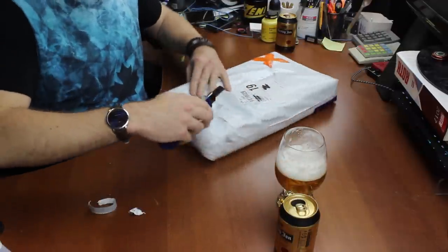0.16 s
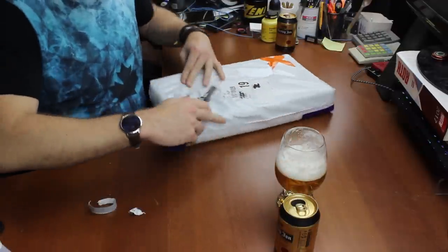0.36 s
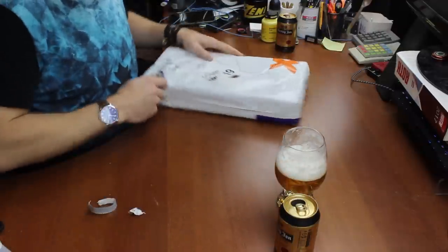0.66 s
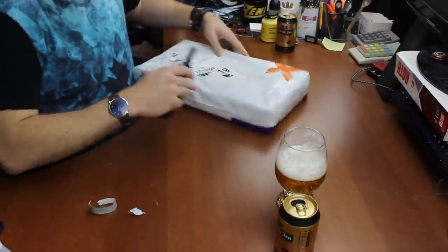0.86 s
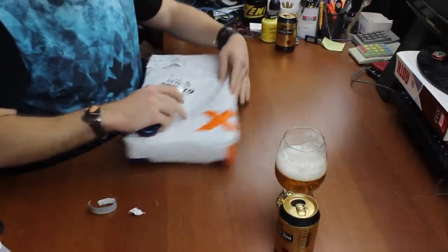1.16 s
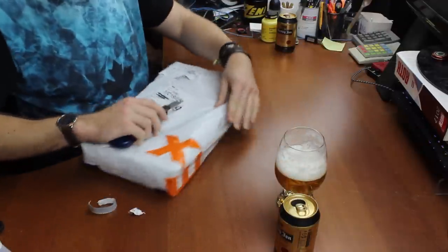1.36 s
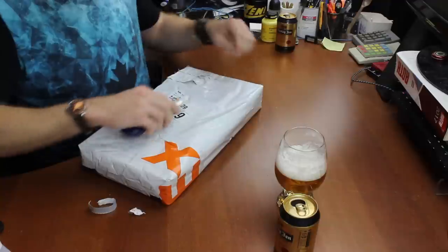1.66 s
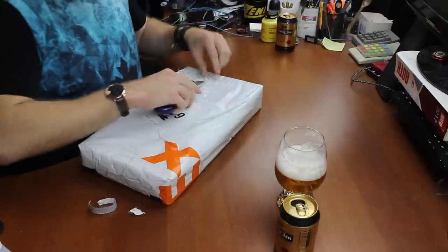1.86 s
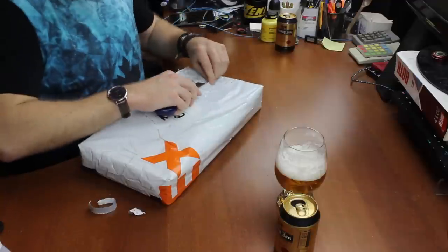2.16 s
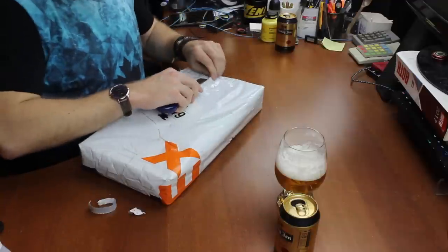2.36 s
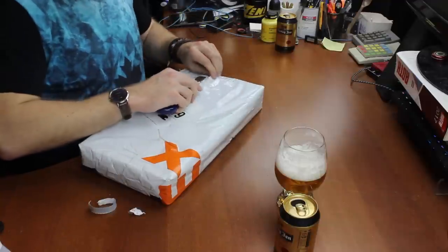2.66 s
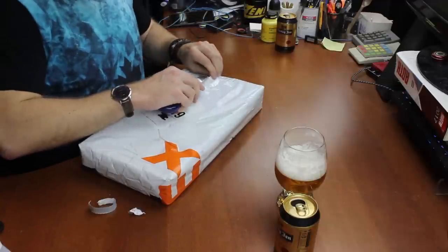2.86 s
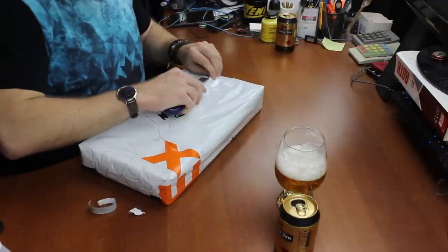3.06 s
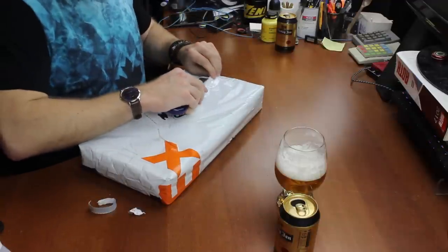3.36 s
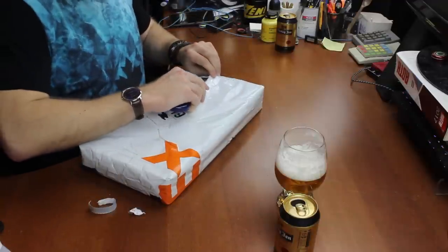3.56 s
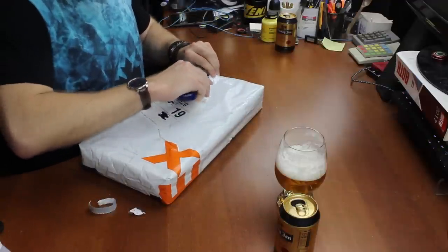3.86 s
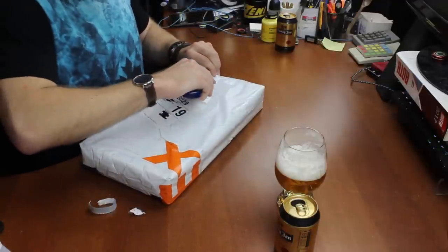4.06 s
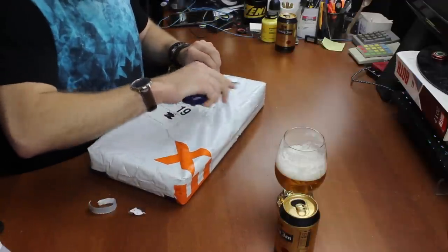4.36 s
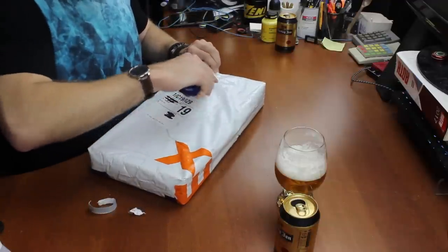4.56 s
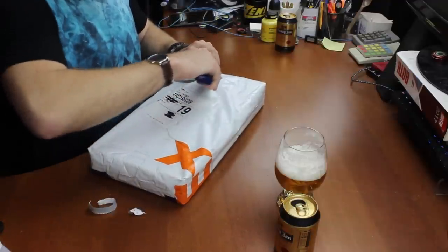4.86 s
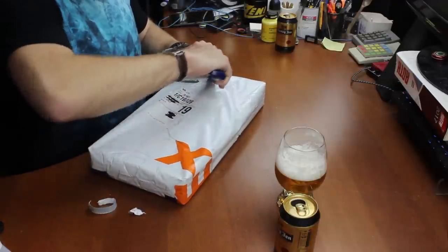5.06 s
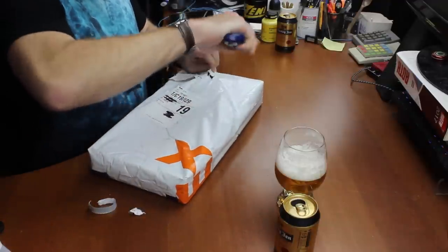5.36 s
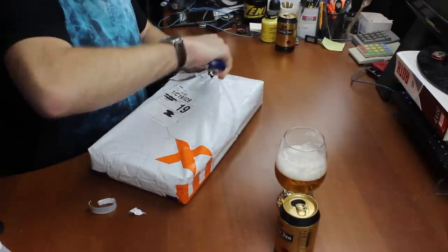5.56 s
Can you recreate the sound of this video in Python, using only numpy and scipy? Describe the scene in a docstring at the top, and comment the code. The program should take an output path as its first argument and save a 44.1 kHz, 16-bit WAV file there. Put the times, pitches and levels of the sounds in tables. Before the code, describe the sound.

Stiff plastic film crinkles as a parcel is turned on a desk, followed by quiet picking, faint cutting rasps and two sharp rips.

```python
"""Slitting open a bagged parcel

A box wrapped in a plastic courier bag is swung round on a wooden desk in a small room, then slit with a
utility knife. The sliding bag is noise from countless slips; taut film snaps as decaying tones with bright
cracks, crinkles as random small pops, and tears in two loud bursts that ring the modes of the box.
A diffuse echo follows close behind, over the room's hush and the low rumble of the camera rocking nearby.
"""
import sys
import numpy as np
from scipy import signal
from scipy.fft import rfft, irfft
from scipy.io import wavfile
from scipy.ndimage import uniform_filter1d

SR = 44100
rng = np.random.default_rng(int(sys.argv[2]) if len(sys.argv) > 2 else 0)


def to_wav(sig):
    """Store sig (one row per channel, or 1-D mono) as 16-bit WAV at the path in sys.argv[1].

    Samples outside -1..1 are clipped; the rate is SR.
    """
    pcm = np.clip(np.atleast_2d(sig), -1, 1) * 32767
    pcm = np.round(pcm).astype(np.int16)
    wavfile.write(sys.argv[1], SR, pcm.T)  # frames by channels


N = 252285
TIME = np.arange(N) / SR
SNAP_S = 0.008  # the span over which the level of a short sound is reckoned

# the box is jolted: t/s, pitch of the struck wall f/Hz, level/dB before the trims in thuds()
JOLTS = [(0.0865, 480, -50), (0.44, 570, -45.5), (0.552, 238, -48.5), (0.643, 234, -46.5),
         (0.771, 395, -47), (0.790, 320, -44), (0.878, 318, -49.5), (1.01, 252, -44.5), (1.2615, 377, -45),
         (1.273, 370, -52), (1.327, 370, -52), (1.528, 408, -49), (2.318, 276, -46), (2.752, 242, -47),
         (3.898, 260, -43), (4.3533, 250, -25.5), (4.383, 250, -24), (4.821, 209, -46.5), (5.156, 258, -48),
         (5.28, 240, -25), (5.3039, 233, -32)]
# the bag slides on the desk: t/s, hiss level/dB, treble level/dB above 9 kHz, both before the trims in slide()
DRAG = [(0, -43.5, -54.5), (0.119, -41, -49.5), (0.22, -43, -52), (0.36, -47.5, -56), (0.5, -43, -53),
        (0.58, -45, -53.5), (0.72, -41.5, -51), (0.84, -45.5, -56.5), (0.92, -42.5, -47.5),
        (1.0, -39.5, -42.5), (1.12, -34, -40.5), (1.22, -27.5, -39.5), (1.32, -35.5, -45.5),
        (1.42, -42, -52.5), (1.55, -46, -55), (1.621, -74, -78)]


def amp(db):
    """Decibels to gain."""
    return 10 ** (np.asarray(db) / 20)


def unit(x):
    """Scales to an rms of one."""
    return x / np.sqrt(np.mean(x ** 2) + 1e-20)


def read(points, hz):
    """Reads a spectrum on a log-frequency axis."""
    f, value = np.transpose(points)
    return np.interp(np.log(hz + 1), np.log(f + 1), value)


def add(mix, s, sound):
    """Mixes a sound in at time s."""
    part = mix[max(round(s * SR), 0):][:len(sound)]
    part += sound[:len(part)]


def sized(x, db, span_s=SNAP_S):
    """Scales a short sound so that its energy, spread over span_s, has this level."""
    return x * amp(db) * np.sqrt(span_s * SR / (np.sum(x ** 2) + 1e-20))


def above(hz, corner_hz, order):
    """A soft step from 0 to 1 around a corner frequency."""
    return 1 / (1 + (corner_hz / (hz + 1)) ** order)


def causal(db):
    """The frequency response with these gains that rings only after it is struck."""
    log_gain = np.log(amp(np.r_[db, db[-2:0:-1]]))
    return np.exp(np.conj(signal.hilbert(log_gain)))[:len(db)]


def noise(spectrum):
    """Steady noise of the given spectrum, at an rms of one."""
    gain = amp(read(spectrum, np.fft.rfftfreq(N, 1 / SR)))
    return unit(irfft(rfft(rng.standard_normal(N)) * gain, N))


def clicks(per_s, spread_db):
    """A random train of clicks, most small and a few large."""
    sizes = amp(spread_db * np.minimum(rng.exponential(1, N), 4))
    return sizes * rng.choice([-1, 1], N) * (rng.random(N) < per_s / SR)


def gesture(start, length, rise_db_per_s, fall_db_per_s):
    """Attack, hold and release in dB: zero while the gesture lasts."""
    early_s = np.maximum(start - TIME, 0)
    late_s = np.maximum(TIME - start - length, 0)
    return -rise_db_per_s * early_s - fall_db_per_s * late_s


def hush(level_db=-59.0):
    """The room's steady background, mostly low-pitched noise."""
    # its spectrum: f/Hz, relative level/dB
    floor = [(20, 4.5), (100, -6.5), (150, -9.5), (230, -3.5), (320, -16.5), (500, -25), (1300, -26.5),
             (3500, -37.5), (15000, -32)]
    return amp(level_db) * noise(floor)


def sway(rest_db=-49.0, drag_db=-38.5, jolt_db=-5.5, lag_s=0.19, width_s=0.21, settle_db_per_s=88):
    """How far the camera rocks, as a gain: the drag shakes the desk, and so does every jolt."""
    drag = amp(drag_db + gesture(0, DRAG[-1][0], 0, settle_db_per_s))
    # the rocking peaks a moment after each jolt, jolt_db relative to its level in the table
    jolts = [amp(db + jolt_db) * np.exp(-((TIME - s - lag_s) / width_s) ** 2) for s, _, db in JOLTS]
    return np.max([drag, *jolts], axis=0) + amp(rest_db)


def rumble():
    """Very low noise from the camera rocking on the desk."""
    # its spectrum: f/Hz, relative level/dB
    rocking = [(5, -7.5), (16, -0.5), (27, -21.5), (42, -18), (70, -38), (250, -71.5)]
    return sway() * noise(rocking)


def room(x, build_s=0.0042, size=26000):
    """The diffuse echo of the small room, each band dying at its own speed."""
    # how long the room rings: f/Hz, t60/s
    ring_times = [(200, 0.29), (1500, 0.2), (5000, 0.3), (9000, 0.22), (15000, 0.23)]
    # strength of its echo: f/Hz, level/dB
    strength = [(100, -14), (600, -10), (1300, -12.5), (2500, -7.5), (6000, -11.5), (9000, -8.5),
                (16000, -9)]
    t = np.arange(size) / SR
    taps = rng.choice([-1., 1.], size) * (rng.random(size) < 1 / 4)
    # nothing until build_s, then a rise of the same length
    taps *= np.clip(t / build_s - 1, 0, 1)
    hz, frame_s, z = signal.stft(taps, SR, nperseg=256)
    t60 = np.maximum(read(ring_times, hz), .1)[:, None]
    fade = amp(-60 * frame_s / t60)
    fade *= amp(read(strength, hz))[:, None] / np.sqrt(np.mean(fade ** 2, axis=1, keepdims=True))
    tail = signal.istft(z * fade, nperseg=256)[1][:size] / np.linalg.norm(taps)
    return signal.oaconvolve(x, tail)[:N]


def moving_echo(x, turn_hz=0.911, count=3):
    """As hands and parcel move, the sound takes changing paths round the room."""
    turn = 2 * np.pi * TIME * turn_hz
    paths = [room(x * np.cos(turn + np.pi * k / count)) for k in range(count)]
    return sum(paths) * np.sqrt(2 / count)


def scatter(x, near_db=-7.0, near_s=0.0035, size=1024):
    """Quick reflections off the desk and the moving hands, drawn afresh on each call."""
    t = np.arange(size) / SR
    taps = rng.standard_normal(size) * np.exp(-t / near_s) * (t > .002)
    return x + amp(near_db) * signal.fftconvolve(x, taps / np.linalg.norm(taps))[:len(x)]


def nudge(start_s=3.52, length_s=0.092, hz=114, sag_octaves=0.4, db=-56.0):
    """A hand leans on the parcel and it gives a soft, low, sinking groan."""
    t, out = np.arange(0, length_s, 1 / SR), np.zeros(N)
    pitch_hz = hz * 2 ** (sag_octaves * (.5 - t / length_s))
    turns = np.cumsum(pitch_hz) / SR
    add(out, start_s, sized(np.sin(2 * np.pi * turns) * np.hanning(len(t)), db, length_s))
    return out


def thuds(ring_trim_db=1.5, push_trim_db=-2.0, push_cycles=0.64, reach_octaves=0.55, spill=0.43,
          span_s=0.0087, size=16000):
    """A jolt pushes a wall of the box; the modes nearest to that wall's pitch ring most."""
    # modes of the box on the desk: f/Hz, relative level/dB, t60/s
    modes = [(43, 2, 0.35), (67.7, 0, 0.3), (163.7, 2.5, 0.2), (198.3, 1, 0.17), (227, 1.5, 0.12),
             (346.5, 1, 0.092), (370, 0, 0.13)]
    t, out = np.arange(size) / SR, np.zeros(N)
    hz, mode_db, t60 = np.transpose(modes)[:, :, None]
    for s, wall_hz, db in JOLTS:
        push = np.sin(2 * np.pi * wall_hz * t) * np.sqrt(t) * np.exp(-t * wall_hz / push_cycles)
        share = spill + np.exp(-(np.log2(hz / wall_hz) / reach_octaves) ** 2)
        # the modes start in step, so the thump is tight and only a faint beating follows
        ring = np.sum(share * amp(mode_db - 60 * t / t60) * np.sin(2 * np.pi * hz * t), axis=0)
        add(out, s, sized(ring, db + ring_trim_db, span_s) + sized(push, db + push_trim_db, span_s))
    return out


def slide(hiss_trim_db=-1.5, sheen_trim_db=3.0, body_hz=3000, sheen_hz=9200, patchy_db=1.45, grain=0.44,
          even_db=-52, body_lag=0.65):
    """Countless tiny slips of film on wood; the hiss brightens as the parcel gathers speed."""
    # colour of the hiss: f/Hz, relative level/dB
    hiss_colour = [(60, 5.5), (200, 2.5), (650, -7), (1000, 0.5), (2100, 6.5), (3600, 1), (5800, 2),
                   (6900, 0), (7900, 2.5), (9500, -1), (13000, 0), (16000, -8)]
    slips = rng.standard_normal(N) + grain * unit(clicks(1200, 4.2))
    hz, t, z = signal.stft(unit(slips), SR, nperseg=512, noverlap=384)
    s, *columns = np.transpose(DRAG)
    hiss, treble = (np.interp(t, s, c) for c in columns)
    # the low body grows more slowly than the hiss: they match at even_db, and it lags by body_lag dB per dB
    body = body_lag * (even_db - hiss)
    sheen = treble - hiss + sheen_trim_db
    hz = hz[:, None]
    # the texture is patchy over neighbouring bands and moments
    patches = uniform_filter1d(rng.standard_normal(z.shape), size=9, axis=0)
    patches = unit(uniform_filter1d(patches, size=16, axis=1))
    colour = read(hiss_colour, hz) + body * (1 - above(hz, body_hz, order=4))
    colour = colour + sheen * above(hz, sheen_hz, order=10)
    z = z * amp(hiss + hiss_trim_db + colour + patchy_db * patches) * (t < s[-1])
    # the hiss level is reckoned over a band 6 kHz wide
    band_share = 6000 / (SR / 2)
    return signal.istft(z, nperseg=512, noverlap=384)[1][:N] / np.sqrt(band_share)


def pop(hz, ring_s=0.0007, overtone=1.438, overtone_share=0.31, size=1024):
    """A panel of taut film flips over: a few cycles swell and die."""
    t = np.arange(size) / SR
    upper_hz = hz * overtone * rng.uniform(0.92, 1.26)
    upper = overtone_share * np.sin(2 * np.pi * upper_hz * t)
    return -(np.sin(2 * np.pi * hz * t) + upper) * t ** 0.47 * np.exp(-t / ring_s)


def crack(sheen_db, fade_s=0.0016, rise_s=0.000086, sheen_hz=9000, size=1024):
    """A short run of tiny breaks, or a single one if fade_s is 0; its 3-9 kHz band has a level of 0 dB."""
    # colour of breaking film: f/Hz, relative level/dB
    crack_colour = [(100, -18), (550, -14), (1400, -2), (2600, -5), (3700, -3), (5500, 1.5), (6800, -3),
                    (8200, 0.5), (9500, -0.5), (13000, 1), (16000, -9)]
    t, hz = np.arange(size) / SR, np.fft.rfftfreq(size, 1 / SR)
    if fade_s:
        breaks = rng.standard_normal(size) * np.exp(-t / fade_s) * (1 - np.exp(-t / rise_s))
    else:
        breaks = signal.unit_impulse(size)
    z = rfft(breaks) * causal(read(crack_colour, hz) + sheen_db * above(hz, sheen_hz, order=10))
    core = irfft(z * (hz > 3000) * (hz < 9000))
    return irfft(z) * np.sqrt(SNAP_S * SR / np.sum(core ** 2))


def creases(low_hz, high_hz, ring_s, crack_db, per_s, count=20):
    """Creases of many sizes, each popping at random; a few pops are large."""
    out = np.zeros(N)
    for hz in np.geomspace(low_hz, high_hz, count):
        crease = sized(pop(hz, ring_s=ring_s), 0) + amp(crack_db) * crack(-19.0)
        out += signal.oaconvolve(clicks(per_s, 4.2), scatter(crease))[:N]
    return unit(out)


def grip(tighten_db_per_s=257.5, relax_db_per_s=108, hold_db=-65.5):
    """How hard the fingers work the bag, as a gain; between squeezes they merely rest on the film."""
    # the fingers squeeze or shift their hold: start t/s, length t/s, level/dB before the shares in crinkle()
    squeezes = [(0.02, 0.29, -48.5), (0.475, 0.16, -42), (0.75, 0.15, -44.5), (1.23, 0.044, -41.5),
                (1.528, 0.15, -55), (1.99, 0.17, -56.5), (2.29, 0.059, -46), (3.04, 0.076, -57),
                (3.306, 0.13, -56.5), (3.512, 0.34, -52.5), (4.005, 0.35, -47.5), (4.382, 0.18, -57.5),
                (4.78, 0.06, -52.5), (4.996, 0.29, -51), (5.228, 0.11, -47.5)]
    curves = [db + gesture(start, length, tighten_db_per_s, relax_db_per_s) for start, length, db in squeezes]
    return amp(np.maximum(np.max(curves, axis=0), hold_db))


def crinkle(fine_db=-5.0, broad_db=-13.0, resting_db=0.5):
    """Small creases tick under the fingers; broad folds bump, a touch stronger once the slide is over."""
    fine = creases(low_hz=950, high_hz=2390, ring_s=0.00062, crack_db=-6.5, per_s=9.0)
    broad = creases(low_hz=302, high_hz=792, ring_s=0.0014, crack_db=-18.0, per_s=22.0)
    resting = TIME > DRAG[-1][0]
    return grip() * (amp(fine_db) * fine + amp(broad_db + resting_db * resting) * broad)


def pressure(bite_db=-68, bite_db_per_s=354, ease_db_per_s=157.5):
    """How hard the blade bears on the film, as a gain: a light bite changes to the end level, then dies away."""
    # strokes of the knife: start t/s, length t/s, rasp level/dB at the end
    strokes = [(1.945, 0.45, -57.5), (3.296, 0.01, -55), (3.506, 0.53, -72), (4.056, 0.24, -43.5),
               (5.067, 0.25, -45.5)]
    total = np.zeros(N)
    for start, length, end_db in strokes:
        bearing_db = np.interp(TIME, [start, start + length], [bite_db, end_db])
        total += amp(bearing_db + gesture(start, length, bite_db_per_s, ease_db_per_s))
    return total


def blade(sheen_db=-11.5, smooth=0.93, spread_db=5.5, count=6):
    """The edge parts the film in a dense run of minute cracks, over a smooth rub."""
    teeth = np.zeros(N)
    for _ in range(count):
        teeth += signal.oaconvolve(clicks(98, spread_db), crack(sheen_db, fade_s=0.00015))[:N]
    rub = signal.oaconvolve(rng.standard_normal(N), crack(sheen_db, fade_s=0))[:N]
    return pressure() * unit(unit(teeth) + smooth * unit(rub))


def snaps(pop_trim_db=-4.5, crack_trim_db=-1.0, full_rip_s=0.0014, rip_growth=0.13, crumb_db=-18.5,
          before_s=0.0024, after_s=.014, lead_db=-28.0, lead_s=0.004, count=3):
    """Each snap is a hollow pop with a bright crack, amid a few crumbs: (towards the microphone, into the room)."""
    # film buckling or giving way: t/s, pitch of the popping panel f/Hz, pop level/dB and crack level/dB
    # (both before trims), sheen level/dB above 9 kHz relative to the crack
    film_snaps = [(0.035, 1310, -35.5, -50, -15), (0.0865, 1280, -37, -45.5, -10),
                  (0.1292, 2050, -35.5, -46, -10), (0.157, 1390, -41, -46, -15),
                  (0.2553, 2050, -35, -59, -18), (0.6, 1500, -44, -53, -13), (0.621, 1800, -39, -44.5, -18),
                  (0.642, 2160, -32, -37, -32), (0.768, 1560, -39, -65, -15),
                  (0.7823, 1760, -33.5, -46.5, -17), (0.789, 1600, -41.5, -42, -17),
                  (0.868, 2550, -40.5, -54, -15), (0.8772, 2550, -36, -37.5, -25),
                  (0.89, 2170, -42, -45, -13), (0.9036, 2260, -33.5, -42.5, -18),
                  (1.011, 1040, -39, -46, -17), (1.1377, 1300, -40, -35.5, -21),
                  (1.2622, 2450, -38, -34, -8), (1.2718, 2280, -31, -42, -10),
                  (1.3201, 1650, -40, -35, -22), (1.327, 1690, -36.5, -44, -20),
                  (1.629, 1600, -60, -53, -12), (1.6485, 2120, -54, -52, -15), (1.757, 1650, -56, -54, 5),
                  (1.8208, 2030, -51, -50, -3), (1.92, 1970, -55, -57.5, -7),
                  (1.955, 2070, -51.5, -59, -14), (2.0109, 2300, -43, -54.5, -42),
                  (2.038, 2200, -45.5, -57, -23), (2.0612, 2310, -51.5, -56, -27),
                  (2.2302, 2070, -47, -42, -11), (2.2733, 1860, -33, -43.5, -10),
                  (2.313, 1710, -34, -54, -25), (2.3189, 1770, -31.5, -36.5, -7),
                  (2.3323, 1980, -35, -42, -47), (2.360, 1660, -57, -51.5, 0),
                  (2.384, 1570, -35.5, -57, -41), (2.461, 1500, -44.5, -59, -33),
                  (2.48, 1920, -48, -63, -28), (2.7508, 1435, -25.5, -36, -22),
                  (3.122, 1460, -47, -58, -23), (3.3138, 1660, -37.5, -43, 4),
                  (3.362, 1500, -38.5, -47, -24), (3.401, 1610, -42.5, -56, -24),
                  (3.431, 1530, -45, -57, -17), (3.5171, 1500, -35.5, -43, -11),
                  (3.5463, 1490, -36, -43.5, -20), (3.6161, 1350, -51, -36, -12),
                  (3.6647, 1620, -41.5, -38, -10), (3.774, 1260, -21.5, -30, -10),
                  (3.8973, 1670, -34, -40, -18), (3.9523, 1220, -37, -51.5, -59),
                  (4.1228, 1420, -36.5, -45, -21), (4.137, 1900, -42, -38.5, -15.5),
                  (4.3534, 1360, -9.5, -20.5, -5.5), (4.383, 1360, -12.5, -17, -14.5),
                  (4.3911, 1570, -20, -35.5, -15), (4.4811, 1460, -34.5, -48.5, -39),
                  (4.5227, 1350, -38, -63, -22), (4.546, 1200, -46.5, -64, -22),
                  (4.812, 1310, -46, -65, -20), (4.8245, 1390, -41.5, -48, -9),
                  (4.8818, 1140, -43, -57.5, -51), (4.9809, 1520, -42, -43.5, -34),
                  (5.0227, 1050, -44.5, -70, -22), (5.039, 1200, -48, -53.5, -14),
                  (5.088, 1250, -57, -51.5, 0), (5.1299, 1230, -31.5, -40, -4),
                  (5.155, 1290, -24.5, -20, -17.5), (5.2363, 1160, -26.5, -44.5, -6),
                  (5.2599, 1330, -23, -29, -13), (5.2753, 1230, -16, -23, -22),
                  (5.281, 1180, -20, -36.5, 1), (5.2844, 1350, -15, -30, -22),
                  (5.3034, 1540, -15, -18, -12), (5.3925, 1630, -39, -35.5, -19.5),
                  (5.4296, 1003, -36.5, -55, -24), (5.4624, 1470, -39, -49, -26),
                  (5.5858, 1900, -84, -44.5, -8), (5.647, 1350, -45.5, -48.5, -20)]
    direct, radiated = np.zeros((2, N))
    for s, hz, low_db, high_db, sheen_db in film_snaps:
        hollow = sized(pop(hz), low_db + pop_trim_db)
        bright = amp(high_db + crack_trim_db)
        # a stronger crack runs on for longer
        fade_s = full_rip_s * bright ** rip_growth
        add(direct, s, scatter(hollow + bright * crack(sheen_db, fade_s=fade_s)))
        # summed over all directions the ripples of a crack's spectrum even out
        add(radiated, s, hollow + bright * crack(sheen_db, fade_s=0))
        # the panel creaks softly as it takes the strain
        add(direct, s - lead_s * (1 + rng.random()), sized(pop(hz), low_db + lead_db))
        # neighbouring creases give way just before and after
        for _ in range(count):
            crumb = sized(pop(hz * rng.uniform(0.73, 2.0)), low_db) + bright * crack(sheen_db)
            add(direct, s + rng.uniform(-before_s, after_s), amp(crumb_db) * rng.random() * crumb)
    return direct, radiated


def scene():
    """The parcel on the desk and its echo, over the room's hush and the rocking of the camera."""
    background = hush() + rumble()
    handling = nudge() + thuds() + slide() + crinkle() + blade()
    direct, radiated = snaps()
    echo = moving_echo(radiated + handling)
    return (direct + handling + echo + background)[None]


def record(dry, edge_hz=16050):
    """The loudest snaps are rounded off at full scale; then the treble is cut above edge_hz."""
    rounded = dry / (1 + dry ** 6) ** (1 / 6)
    lowpass = signal.firwin(301, edge_hz, window=("kaiser", 8), fs=SR)
    return signal.oaconvolve(rounded, lowpass[None], "same")


dry = scene()
out = record(dry)
to_wav(out)
```